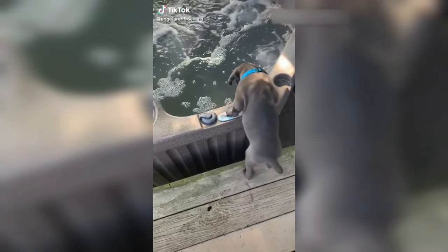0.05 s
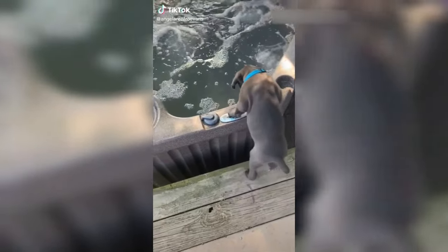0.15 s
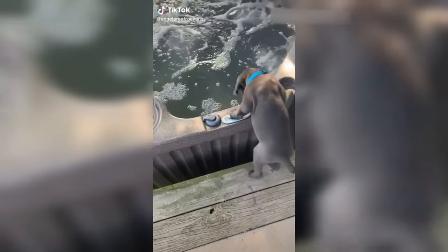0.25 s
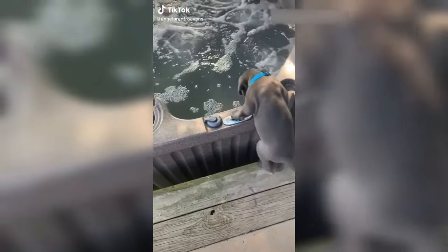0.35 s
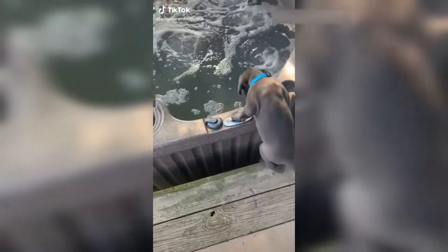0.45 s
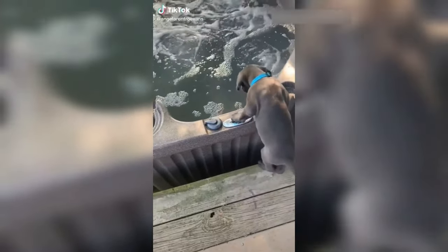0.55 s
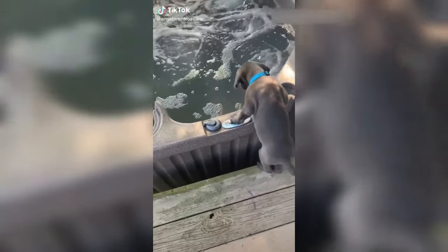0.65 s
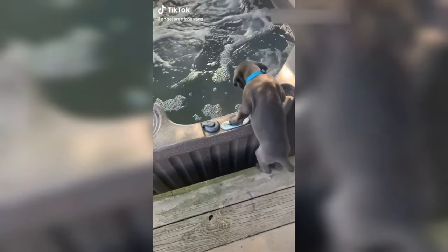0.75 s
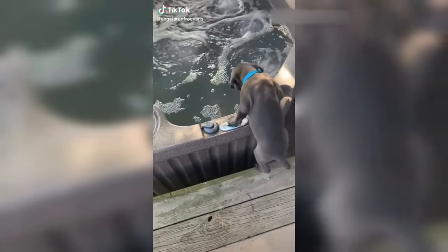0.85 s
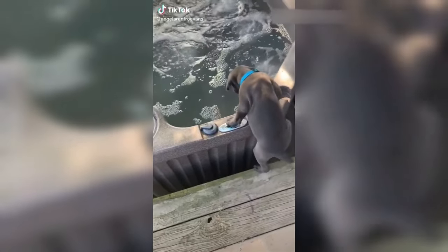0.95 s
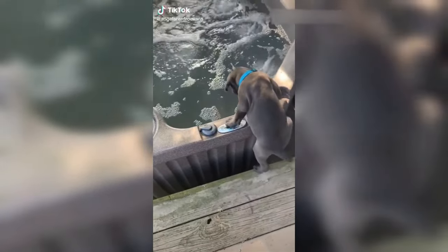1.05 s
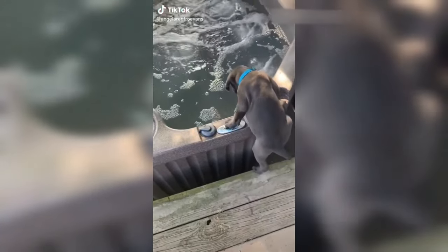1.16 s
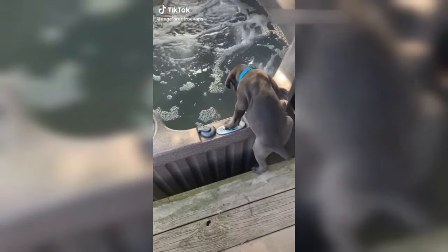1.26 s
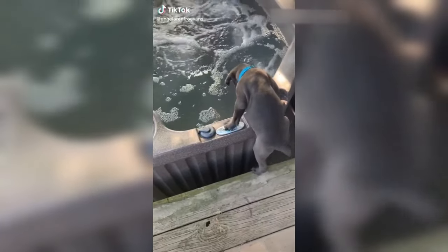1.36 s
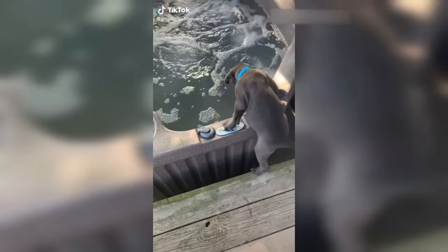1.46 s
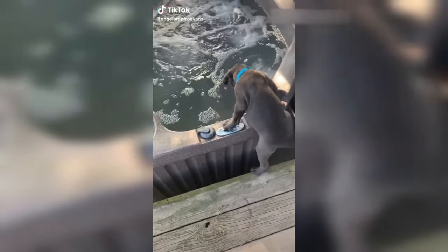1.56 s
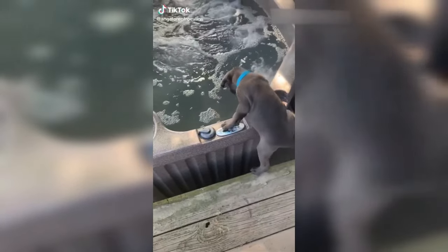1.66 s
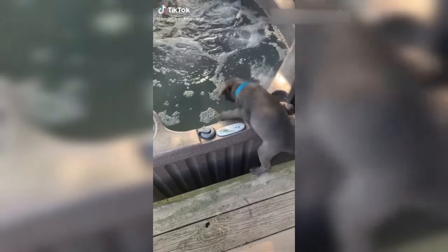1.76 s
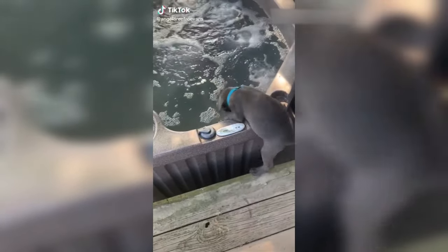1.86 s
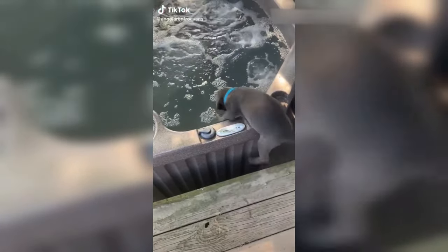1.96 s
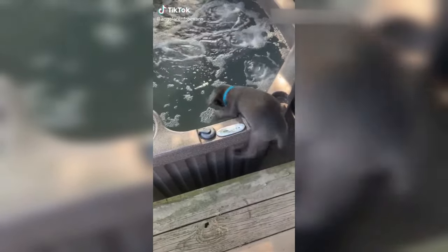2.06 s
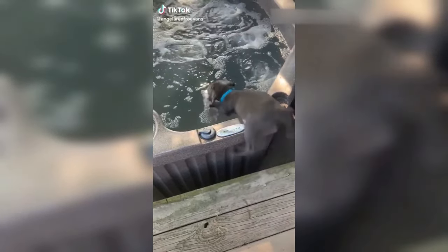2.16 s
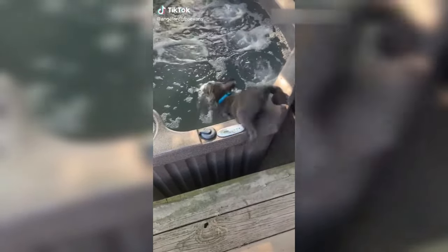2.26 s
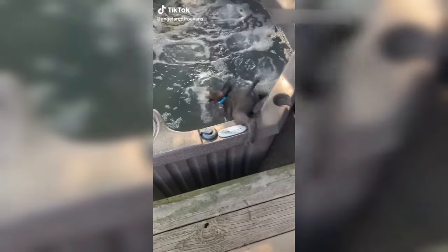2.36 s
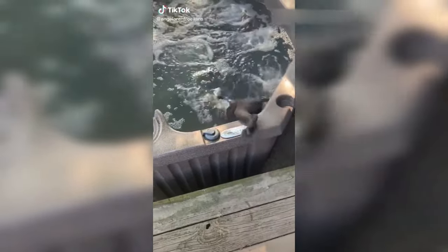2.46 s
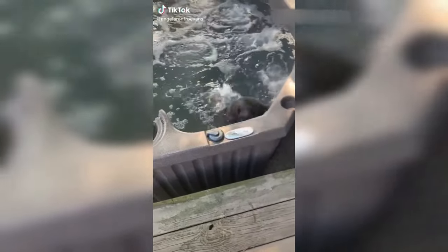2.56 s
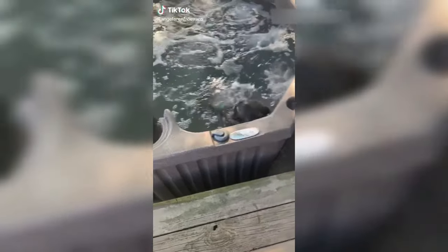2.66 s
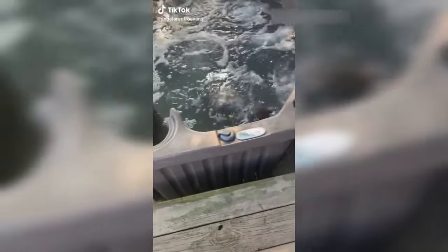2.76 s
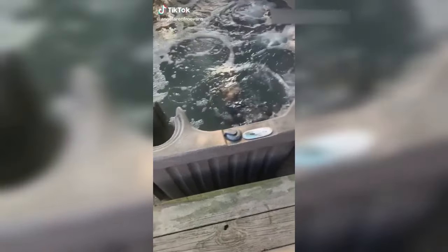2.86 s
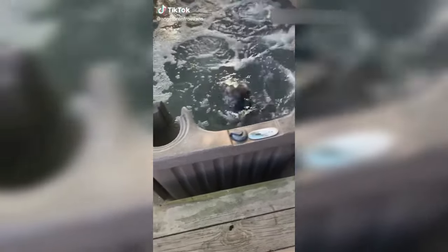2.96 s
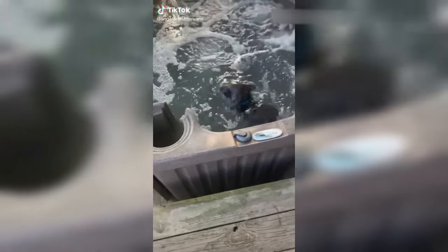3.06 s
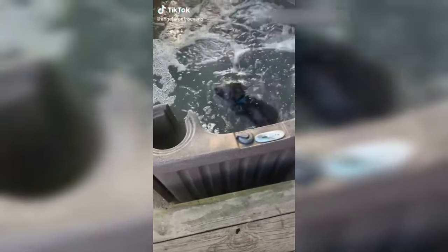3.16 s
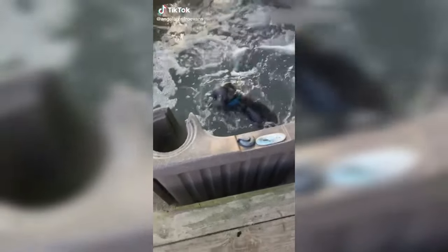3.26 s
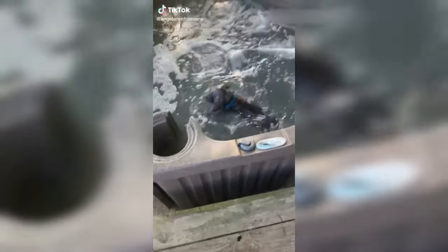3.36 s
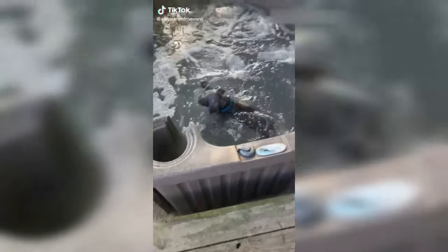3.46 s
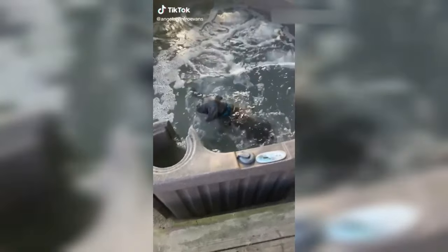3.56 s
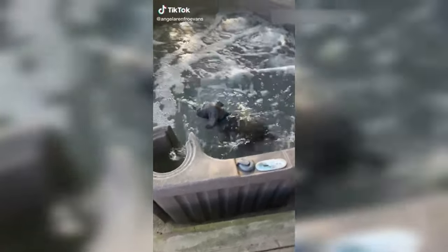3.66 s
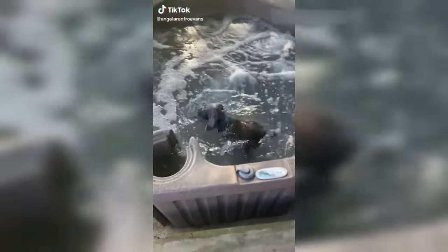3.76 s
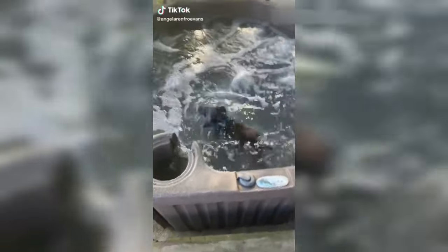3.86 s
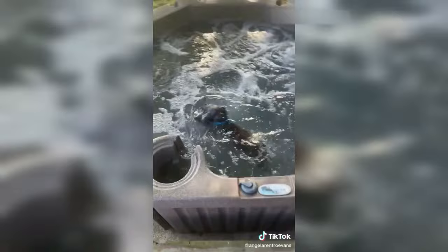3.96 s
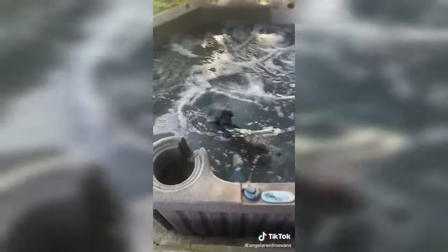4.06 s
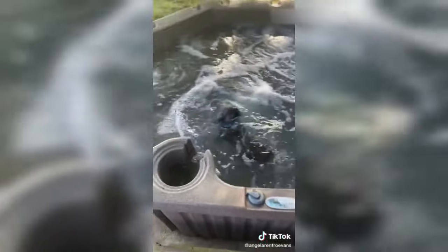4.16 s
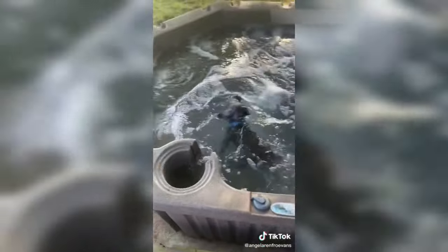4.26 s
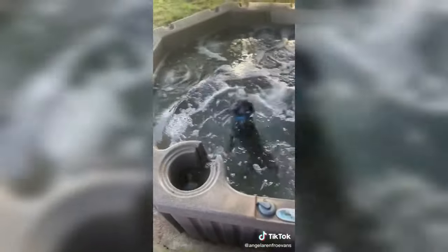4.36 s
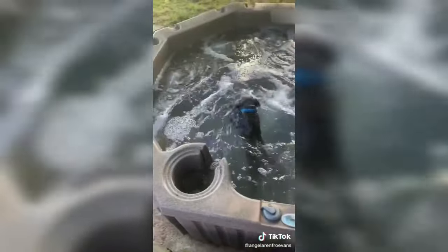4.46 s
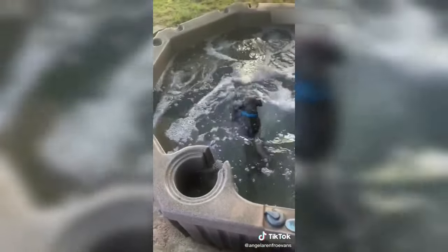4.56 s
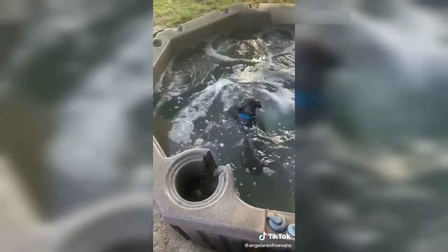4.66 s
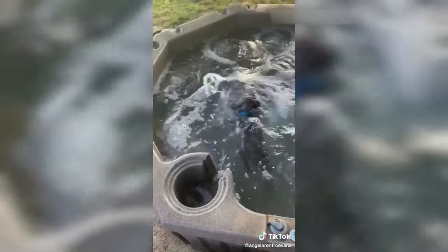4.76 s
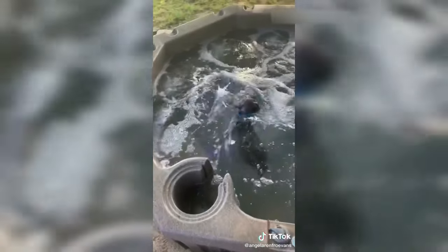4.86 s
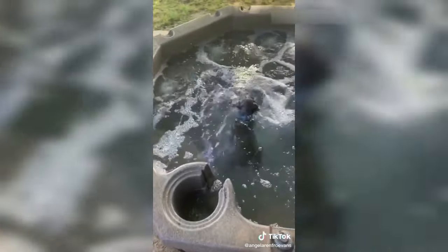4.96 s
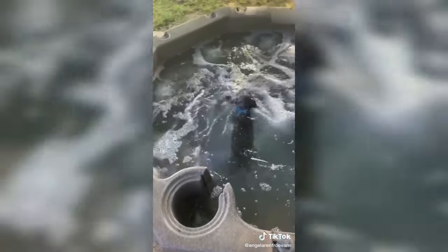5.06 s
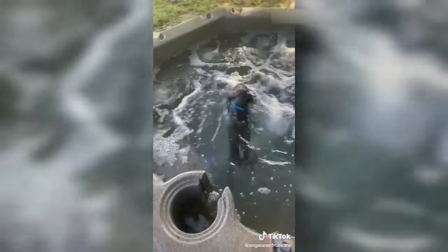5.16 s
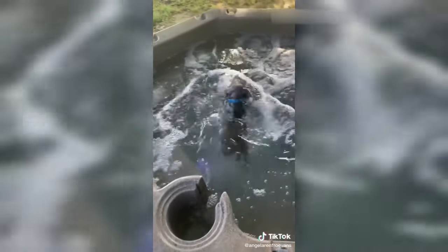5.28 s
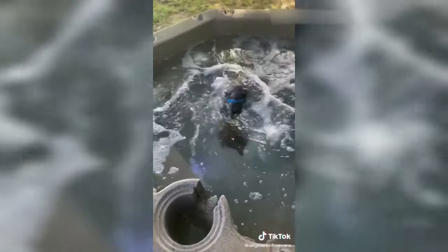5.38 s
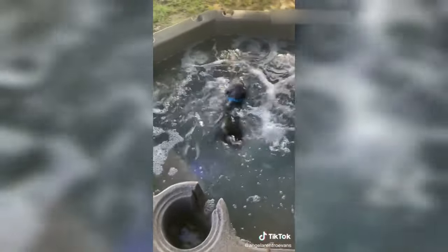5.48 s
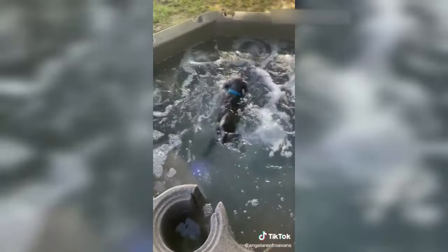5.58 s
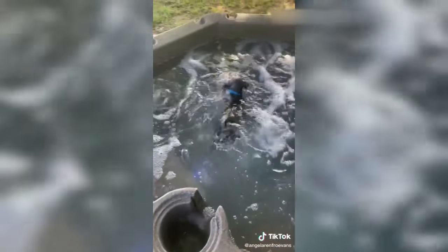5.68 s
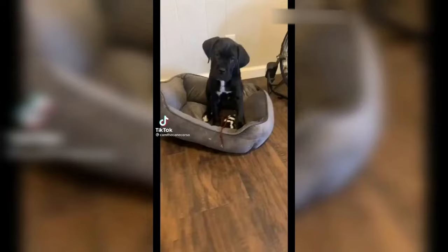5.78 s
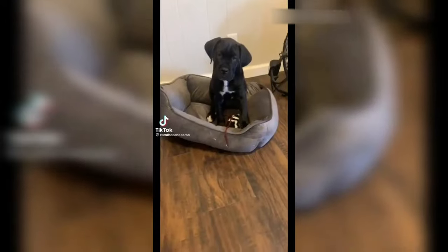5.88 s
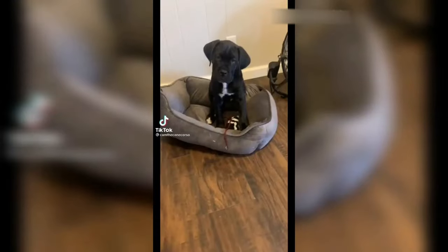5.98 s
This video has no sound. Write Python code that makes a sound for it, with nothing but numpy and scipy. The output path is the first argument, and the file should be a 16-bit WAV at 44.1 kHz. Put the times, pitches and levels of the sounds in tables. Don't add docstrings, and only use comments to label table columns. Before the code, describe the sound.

A continuous wash of jet-churned water, soft rumble and hissing foam opens the scene. Light splashes lead to one big, round plop and gulp as a small dog falls in, scattering droplets. The stereo image shifts as the handheld microphone turns. Sparse plops give way to busier, wetter paddling near the end, then sudden near-silence.

```python
import sys
import numpy as np
from scipy import signal
from scipy.fft import rfft, irfft, next_fast_len
from scipy.io import wavfile
from scipy.ndimage import uniform_filter1d, map_coordinates

SR = 44100
rng = np.random.default_rng(int(sys.argv[2]) if len(sys.argv) > 2 else 0)


def gain_from_db(level_db):
    decades = np.asarray(level_db, float) / 20
    return 10 ** decades


def file_out(sig):
    cols = np.atleast_2d(sig).T
    lim = np.clip(cols, -1, 1)
    pcm = np.round(lim * 32767).astype(np.int16)
    wavfile.write(sys.argv[1], SR, pcm)


N = 265702
TIME = np.arange(N) / SR
TURN_S = 2.635


def unit(x):
    return x / np.sqrt(np.mean(x ** 2) + 1e-20)


def along(points, hz):
    f, *columns = np.transpose(points)
    return [np.interp(np.log(hz + 1), np.log(f + 1), c) for c in columns]


def wobble(rate):
    knots = rng.standard_normal(int(N * rate / SR) + 4)
    return map_coordinates(knots, [np.arange(N) * rate / SR])


def filtered(x, response):
    m = next_fast_len(N + 8192)
    return irfft(rfft(x, m) * response(np.fft.rfftfreq(m, 1 / SR)), m)[..., :N]


def coloured(x, spectrum):
    return filtered(x, lambda hz: gain_from_db(along(spectrum, hz)[0]))


def smoothed(field, bins, frames):
    return uniform_filter1d(uniform_filter1d(field, size=bins, axis=0), size=frames, axis=1)


def rush(spectrum, patchy_db):
    z = signal.stft(rng.standard_normal(N), nperseg=512)[2]
    patches = unit(smoothed(rng.standard_normal(z.shape), 5, 6))
    noise = signal.istft(z * gain_from_db(patchy_db * patches), nperseg=512)[1][:N]
    return unit(coloured(noise, spectrum))


def bubbles(s, size, hz, t60, climb, length, start=1.64):
    t = np.arange(int(length * SR)) / SR
    s, size, hz, t60 = (np.asarray(v)[:, None] for v in (s, size, hz, t60))
    ring = np.sin(2 * np.pi * hz * t * (1 + climb * t / t60)) * gain_from_db(-60 * t / t60)
    ring = size * ring * (1 - np.exp(-t * hz / start))
    at = (s * SR).astype(int) + np.arange(len(t))
    return np.bincount(at.ravel(), ring.ravel(), N + SR)[:N]


def swarm(count, hz, spread, cycles, scatter_db, length):
    u, g = rng.random((count, 2)), rng.standard_normal(count)
    pitch_hz = np.clip(hz * np.exp(spread * g), 60, 15000)
    size = gain_from_db(-scatter_db * np.log(1 - .93 * u[:, 1]))
    return unit(bubbles(u[:, 0] * N / SR, size, pitch_hz, cycles / pitch_hz, 0.092, length))


def scattered(x):
    z = signal.stft(x, nperseg=512, noverlap=384)[2]
    real = smoothed(rng.standard_normal(z.shape), 3, 8)
    imaginary = smoothed(rng.standard_normal(z.shape), 3, 8)
    turn = np.exp(1j * np.arctan2(imaginary, real))
    flicker = gain_from_db(1.6 * unit(smoothed(rng.standard_normal(z.shape), 12, 12)))
    return 1.5 * signal.istft(z * turn * flicker, nperseg=512, noverlap=384)[1][:N]


def ports(pair, facing):
    def response(hz):
        lead, alike, pan_db = along(facing, hz)
        u = np.arccos(np.clip(alike, 0, 1)) / 2
        half = gain_from_db(pan_db / 2) * np.exp(-.5j * lead)
        left = [np.cos(u) * half, np.sin(u) * half]
        right = [np.cos(u) / half, -np.sin(u) / half]
        return np.array([left, right])
    return filtered(pair, response).sum(axis=1)


def pump():
    turn = 2 * np.pi * np.cumsum(120.15 + 1.475 * wobble(12)) / SR
    level = np.sqrt(2) * gain_from_db(-41.5 + 2 * wobble(6.7))
    return level * (np.sin(turn) + gain_from_db(-31.5) * np.sin(2 * turn))


# (time [s], peak [dB], frequency [Hz], half length [s])
BOOMS_AND_PUSHES = [(0.13, -32, 77, 0.037), (0.273, -33.5, 61.3, 0.072), (0.545, -34, 68.8, 0.051),
                    (1.085, -39, 55, 0.06), (1.79, -32.5, 62.3, 0.12), (1.868, -38, 45, 0.05),
                    (2.595, -35, 66, 0.068), (2.814, -34, 55.1, 0.06), (2.975, -36.5, 72.3, 0.19),
                    (3.038, -36, 52, 0.057), (3.666, -33, 55.8, 0.044), (4.58, -34.5, 59.3, 0.087),
                    (5.15, -39.5, 50.6, 0.091), (5.348, -39, 60.7, 0.037), (5.558, -31.5, 59.1, 0.039),
                    (2.4585, -26, 480, 0.0029), (4.763, -18.5, 450, 0.0019), (5.3275, -23.5, 200, .004),
                    (5.722, -39.5, 65, 0.073)]


def booms_and_pushes():
    total = np.zeros(N)
    for s, db, hz, half in BOOMS_AND_PUSHES:
        envelope = np.cos(np.pi / 2 * np.clip((TIME - s) / half, -1, 1)) ** 2
        total += gain_from_db(db) * envelope * np.sin(2 * np.pi * hz * TIME)
    return total


# (frequency [Hz], density [dB per Hz])
RUMBLE_SPECTRUM = [(15, -41), (30, -14.5), (45, -3.5), (62, 1), (85, -1), (110, 1), (160, -34.5)]


def rumble():
    return gain_from_db(-45 + 1.5 * wobble(11)) * rush(RUMBLE_SPECTRUM, patchy_db=-1.0) + booms_and_pushes()


# (time [s], agitation [dB])
AGITATION = [(0.0, 1.5), (0.5, 0.5), (1.9, 2.5), (2.12, 3.5), (2.3, 14), (2.45, 7), (2.68, 2.5), (3.2, 5),
             (3.66, 0), (4.3, 0.5), (4.54, 3), (4.71, 5.5), (4.85, 5), (5.0, 2.5), (5.3, 4.5), (5.6, 4)]


def agitation_db():
    s, db = np.transpose(AGITATION)
    return np.interp(TIME, s, db)


# (frequency [Hz], density [dB per Hz])
CHURN_SPECTRUM = [(80, -27), (140, -7.5), (280, 3), (400, -2.5), (550, -10), (750, -13.5), (1000, -25),
                  (1500, -36.5), (3000, -65.5)]


def churn():
    boil = swarm(count=2400, hz=300.6, spread=0.445, cycles=17.8, scatter_db=2.5, length=0.038)
    level_db = -41 + 0.08 * agitation_db() + 1.04 * wobble(18)
    return gain_from_db(level_db) * unit(rush(CHURN_SPECTRUM, patchy_db=0.5) + 0.48 * boil)


# (frequency [Hz], density [dB per Hz])
WASH_SPECTRUM = [(400, -6), (800, 1.5), (1300, 0), (2500, -8.5), (3200, -6.5), (4200, -11), (7000, -18)]


def wash():
    gurgle = swarm(count=2500, hz=1335, spread=0.604, cycles=25, scatter_db=0.0, length=0.024)
    level_db = -56.5 + 1.19 * agitation_db() + 1.5 * (TIME > TURN_S) + 0.54 * wobble(33)
    return gain_from_db(level_db) * unit(rush(WASH_SPECTRUM, patchy_db=2) + 0.46 * gurgle)


# (frequency [Hz], density [dB per Hz])
FOAM_SPECTRUM = [(700, -27.5), (1500, -2), (3000, -8.5), (4800, -1), (6000, 3), (9500, -3), (12600, -2),
                 (14800, -4), (15500, -19), (16500, -38.5)]
# (frequency [Hz], share [dB])
SIZZLE_BAND = [(10800, -40), (11500, 0), (13700, 0), (14300, -40)]
# (frequency [Hz], share [dB])
SHADED_BAND = [(8500, -40), (9000, 0), (10500, 0), (11000, -40)]


def foam():
    fizz = swarm(count=4000, hz=6560, spread=0.504, cycles=20, scatter_db=2.5, length=.006)
    level_db = -55 + 0.55 * agitation_db() + 1.5 * (TIME > TURN_S) + 1.3 * wobble(20)
    froth = gain_from_db(level_db) * unit(rush(FOAM_SPECTRUM, patchy_db=2) + 0.38 * fizz)
    fits = gain_from_db(-1 + 5.5 * np.tanh(2 * wobble(45))) - 1
    shade = .42 * (TIME > .83) * (TIME < 2.05)
    return froth + fits * coloured(froth, SIZZLE_BAND) - shade * coloured(froth, SHADED_BAND)


# (time [s], peak [dB], frequency [Hz], crack re peak [dB])
DROPLETS = [(1.568, -32, 6800, -30), (1.973, -34.5, 8100, -13.5), (2.0713, -33, 7130, -30),
            (2.148, -26.5, 8200, -27), (2.28, -19.5, 8250, -32.5), (2.397, -33, 8100, -20.5),
            (2.4552, -19.5, 9300, -12), (2.5563, -29.5, 6780, -8), (2.9554, -34.5, 6850, -2.5),
            (2.9902, -23.5, 7150, -22), (3.1642, -31.5, 7000, -32), (3.295, -26, 6650, -3.5),
            (4.1988, -40.5, 7960, -23.5), (4.431, -28.5, 8050, -27), (4.5096, -41.5, 6060, -22),
            (4.5341, -43.5, 13900, -21.5), (4.6329, -44.5, 8200, -12.5), (4.714, -33, 7650, -9),
            (4.8793, -33, 8000, -18), (4.962, -25.5, 7700, -27), (5.227, -38.5, 7150, -16.5),
            (5.3192, -20.5, 7740, -13), (5.5198, -32, 7310, -6), (5.582, -29.5, 7650, -10.5),
            (5.789, -39, 8490, -3)]
# (frequency [Hz], density [dB per Hz])
SPRAY_SPECTRUM = [(1000, -19.5), (2500, 5.5), (5000, 6.5), (8000, 1.5), (11000, -2.5), (15300, -6.5),
                  (15900, -22.5), (16500, -87)]


def drops():
    s, db, hz, crack_db = np.transpose(DROPLETS)
    t60 = np.full(len(s), 0.015)
    n = np.arange(SR // 50)
    crack = 1.06 * gain_from_db(-60 * n / SR / t60[:, None]) * rng.standard_normal((len(s), len(n)))
    at = (s[:, None] * SR).astype(int) + n

    def lay(level_db):
        return np.bincount(at.ravel(), (gain_from_db(level_db)[:, None] * crack).ravel(), N + SR)[:N]

    full = coloured(lay(db + crack_db + 2.5), SPRAY_SPECTRUM)
    thin = filtered(lay(db - 5), lambda f: 1 / (1 + (5800 / (f + 1)) ** 8) / (1 + (f / 10500) ** 4))
    return bubbles(s, gain_from_db(db - 2.5), hz, t60, 0.15, .03, start=4.6) + full + thin


# (time [s], peak [dB], frequency [Hz], t60 [s])
AIR_POCKETS = [(2.276, -7, 364, 0.049), (4.744, -31, 326, 0.077), (4.756, -17.5, 336, 0.08),
               (5.253, -20.5, 392, 0.11), (5.285, -23.5, 336, 0.083), (5.321, -19.5, 190, 0.084),
               (5.392, -25, 400, 0.1), (5.525, -20.5, 396, 0.058), (5.549, -29.5, 150.4, 0.11),
               (5.791, -22.5, 273, 0.13), (2.455, -33, 398, 0.084), (2.5, -33, 600, 0.037),
               (4.76, -27, 201.4, 0.066)]


def gulps():
    s, db, hz, t60 = np.transpose(AIR_POCKETS)
    return gain_from_db(0.53 * wobble(120)) * bubbles(s, gain_from_db(db + 1.0), hz, t60, 0.13, .15)


# (time [s], peak [dB], frequency [Hz], left re right [dB], t60 [s])
LARGEST_BUBBLES = [
    (2.277, -0.5, 1140, 0.5, 0.03),
    (2.277, -15, 647, 1.5, 0.084),
    (2.2809, -14, 1304, -5, 0.03),
    (4.759, -18.5, 709, 0, 0.063),
    (4.948, -18, 1570, -9, 0.038),
    (4.951, -18, 1048, -4, 0.063),
    (4.963, -21, 1046, -4, 0.063),
    (5.222, -24.5, 1875, 0, 0.062),
    (5.519, -14, 1045, -8, 0.05),
]
# (time [s], peak [dB], frequency [Hz], left re right [dB])
SINGLE_BUBBLES = [(1.439, -34, 1173, 0), (2.162, -29.5, 1320, 0), (2.199, -26, 1314, 1),
                  (2.358, -33, 1334, 0), (2.476, -25, 1187, -7), (2.552, -30, 1530, -1.5),
                  (2.59, -26, 1120, -1), (3.055, -28, 1190, -6), (3.104, -29, 773, 0),
                  (3.145, -34, 1290, -1), (3.251, -38, 1224, 1), (3.494, -33, 634, 2),
                  (3.936, -32.5, 1120, -8), (4.327, -36, 1106, -6), (4.415, -24.5, 1000, -5),
                  (4.326, -37, 1460, -2), (4.05, -40, 1350, -1), (3.915, -34, 1225, -2),
                  (4.632, -23.5, 1540, -3), (4.655, -25.5, 910, -14), (4.772, -19.5, 722, -9),
                  (4.8, -22, 1200, -3), (5.015, -24.5, 665, -5), (5.401, -31, 784, -12),
                  (5.501, -33, 1380, -0.5), (5.539, -33, 904, -14), (5.781, -25, 673, -18)]
# (time [s], peak [dB], frequency [Hz])
SMALL_BUBBLES = [(2.49, -29, 3230), (2.5561, -25.5, 2020), (2.7392, -44, 1630), (2.782, -37.5, 1690),
                 (2.891, -37.5, 3230), (3.089, -47, 1760), (3.149, -31, 1646), (3.3744, -49, 3080),
                 (3.5494, -43, 1910), (3.934, -34.5, 1880), (4.0552, -40, 1980), (4.3277, -32, 2500),
                 (4.376, -36, 1790), (4.687, -35, 1620), (4.7804, -24, 1700), (4.8294, -35, 3420),
                 (5.0494, -49, 2100), (5.3243, -30, 2100), (5.337, -25.5, 3000), (5.5244, -28, 2030),
                 (5.686, -31.5, 3900), (2.504, -32, 2350), (2.554, -29.5, 3370), (3.2932, -30.5, 3160),
                 (4.062, -37, 2950), (2.642, -37, 3160), (2.692, -37, 1480), (4.687, -28, 4100),
                 (4.948, -33, 2350), (5.01, -49, 3780)]
# (time [s], peak [dB], frequency [Hz])
WATER_CLUCKS = [(2.5545, -30, 1500), (2.555, -22, 2600), (2.4545, -24, 1460), (2.499, -30, 1230),
                (2.822, -35, 1230), (2.913, -33, 1480), (3.012, -40, 1540), (3.082, -31, 1600),
                (3.163, -25, 1270), (3.164, -34, 750), (3.232, -40, 2130), (3.412, -29, 1050),
                (3.413, -30, 1420), (3.524, -34, 1800), (3.537, -32, 1240), (3.548, -36, 1300),
                (3.568, -36, 1250), (4.631, -35.5, 2500), (4.632, -26, 985), (4.657, -31.5, 2030),
                (4.666, -31.5, 1630), (4.698, -33.5, 1290), (4.727, -28.5, 950), (4.7595, -17, 520),
                (4.7605, -21, 1270), (4.762, -24.5, 1980), (4.785, -25, 895), (4.922, -40, 2370),
                (4.935, -36, 2400), (4.949, -24.5, 2130), (5.007, -42, 2100), (5.238, -29, 1800),
                (5.248, -30, 1330), (5.285, -38, 4000), (5.32, -33, 2940), (5.354, -31.5, 1870),
                (5.36, -37, 3030), (5.37, -26, 930), (2.515, -34, 700), (2.53, -31, 620), (2.575, -32, 500),
                (2.695, -35, 690), (2.735, -40, 720), (3.625, -32, 1000), (3.70, -45, 1300),
                (3.80, -48, 1500), (4.16, -44, 1100), (4.35, -43, 750), (4.44, -36, 1290),
                (4.82, -34, 1500), (5.08, -46, 1300), (5.275, -41, 1410), (5.30, -33, 1980),
                (5.431, -36, 1000), (5.545, -30, 1050), (5.558, -31, 2900), (2.503, -33, 3400),
                (2.512, -34, 4200), (2.525, -33.5, 3500), (4.417, -25, 740)]


def plops():
    rows = LARGEST_BUBBLES + [(*row, 0.061) for row in SINGLE_BUBBLES]
    rows = rows + [(s, db, hz, -3 + 3 * np.log2(hz / 2000), 0.036) for s, db, hz in SMALL_BUBBLES]
    rows = rows + [(s, db, hz, -3, 0.019) for s, db, hz in WATER_CLUCKS]
    s, db, hz, pan_db, t60 = np.transpose(rows)
    lag = np.where(s < TURN_S, 24, -4) / SR
    ragged = gain_from_db(1.6 * wobble(230))
    left = bubbles(s + lag, gain_from_db(db - 1.5 + pan_db / 2), hz, t60, 0.074, .08, start=2.13)
    right = bubbles(s, gain_from_db(db - 0.5 - pan_db / 2), hz, t60, 0.083, .08, start=2.13)
    return ragged * np.array([left, right])


# (time [s], bubble cloud [dB], slosh re cloud [dB], spray re cloud [dB])
SLAPPING_STROKES = [(2.07, -33.5, 7, -6.5), (2.14, -31, -1, -8), (2.278, -16, -15, -44),
                    (2.453, -26.5, 6, -0.5), (2.552, -26.5, 2.5, -11.5), (3.058, -33, -1, -4),
                    (3.149, -35, 10, -19), (3.41, -36.5, -10, -39), (4.41, -27.5, -3, -12),
                    (4.636, -25, -17.5, -17.5), (4.753, -20.5, -3.5, -28.5), (4.951, -21, -20, -18.5),
                    (5.004, -31.5, 13.5, -10), (5.224, -26.5, 6.5, -5.5), (5.322, -29.5, 8, -3),
                    (5.518, -22.5, -11.5, -23)]
# (time [s], bubble cloud [dB], slosh re cloud [dB], spray re cloud [dB])
SWELLING_STROKES = [(2.262, -25, -15, -3.5), (2.492, -24, -4, -7.5), (2.69, -53, -6, 10),
                    (2.949, -50.5, 1, 8), (3.532, -38, -11, -28), (3.913, -39.5, -13, -17),
                    (4.038, -41.5, -12, -4.5), (4.313, -32, -23, -4.5), (4.685, -30, -14, -10.5),
                    (4.727, -26, 4, -4), (5.247, -38, 7, -5), (5.4, -41.5, -2, -23.5),
                    (5.502, -35, -16, -26.5), (2.632, -56.5, -13, 12), (5.65, -53, -10, -2),
                    (4.79, -45, -7, -23), (5.772, -22.5, -3.5, -9), (5.36, -45.5, -4.5, -20)]


def splashes():
    t = np.arange(SR // 2) / SR
    swell = np.zeros((3, N + SR))
    strokes = [(*row, 0.0022, 0.24) for row in SLAPPING_STROKES]
    strokes += [(*row, 0.032, 0.23) for row in SWELLING_STROKES]
    for s, db, slosh_db, spray_db, rise, t60 in strokes:
        t60 = t60 + 0.0039 * spray_db
        shape = (1 - np.exp(-t / rise)) * gain_from_db(-60 * t / t60)
        levels = gain_from_db([[db], [db + slosh_db], [db + spray_db]])
        swell[:, round(s * SR):][:, :len(t)] += levels * shape / shape.max()
    cloud = swarm(count=6000, hz=1600, spread=.6, cycles=26, scatter_db=4, length=.03)
    cloud = unit(cloud + 1.1 * rush(WASH_SPECTRUM, patchy_db=1.5))
    slosh = swarm(count=1500, hz=306, spread=0.21, cycles=4.6, scatter_db=0.0, length=.04)
    mist = swarm(count=5000, hz=6000, spread=.5, cycles=18, scatter_db=4, length=.006)
    spray = unit(rush(SPRAY_SPECTRUM, patchy_db=2.5) + .4 * mist)
    return np.sum(swell[:, :N] * gain_from_db([[-9], [-14], [-7]]) * [cloud, slosh, spray], axis=0)


# (frequency [Hz], right leads [rad], likeness [0-1], left re right [dB])
FACING_RIM = [(100, .1, .96, -1), (450, .6, .93, -2), (700, 1.4, .6, -1), (900, 3.1, .93, 0),
              (1500, 5.2, .5, 0), (2400, 3.14, .55, 0), (2650, 3.14, .93, 0), (2950, 3.14, .93, 0),
              (3200, 3.14, .62, 0), (3600, 3.14, .62, 0), (4300, 3.1, .2, 0), (5300, 3.14, .86, 0),
              (7700, 0, .88, 0), (8900, 0, .9, 0), (9500, 0, .35, 0), (11500, 0, .75, 0), (15500, 0, .6, 0)]
# (frequency [Hz], right leads [rad], likeness [0-1], left re right [dB])
FACING_WATER = [(100, .1, .96, -1), (450, .4, .95, -2), (900, 1.5, .5, -3), (1300, -.3, .8, -2),
                (2300, -1.5, .4, -1), (2700, -1.8, .4, 0), (3200, -2.8, .55, 0), (4350, -2.4, .3, 0),
                (4700, -3.14, .95, 0), (5600, -3.14, .95, 0), (6100, -4, .55, 0), (7650, -6.28, .99, 0),
                (9450, -6.28, .99, 0), (10000, -7.3, .5, 0), (11000, -8.8, .6, 0), (11600, -9.42, .985, 0),
                (13600, -9.42, .99, 0), (14000, -11, .45, 0), (14900, -12.57, .98, 0)]


def scene():
    tub = rumble() + churn() + wash() + foam()
    pup = splashes() + gulps() + drops()
    pair = np.array([tub + pup, scattered(tub + .6 * pup)])
    rim = ports(pair, FACING_RIM)
    change = ports(pair, FACING_WATER) - rim
    low = filtered(change, lambda hz: 1 / (1 + (hz / 1100) ** 8))
    turned = np.clip((TIME - TURN_S) / 0.004, 0, 1)
    low_turned = np.clip((TIME - 2.95) / 0.16, 0, 1)
    heard = rim + turned * (change - low) + low_turned * low
    return heard + plops() + pump() * gain_from_db([[-.5], [.5]])


def roll_off(x):
    return signal.sosfilt(signal.butter(12, 16480, fs=SR, output="sos"), x)


def record(dry):
    after = TIME - 5.8045
    dull = filtered(dry, lambda hz: 1 / (1 + (hz / 500) ** 4))
    trace = dull * gain_from_db(-48 - 900 * np.abs(after)) * (after < .028)
    kept = filtered(dry * np.clip(-after / .0015, 0, 1), lambda hz: hz < 15650)
    return roll_off(np.where(after < .001, kept, trace))


dry = scene()
out = record(dry)
file_out(out)
```